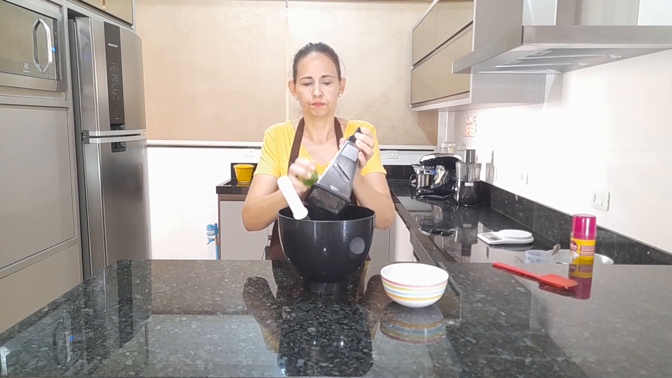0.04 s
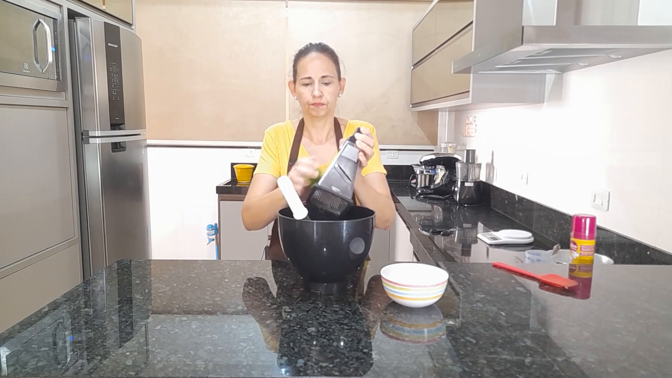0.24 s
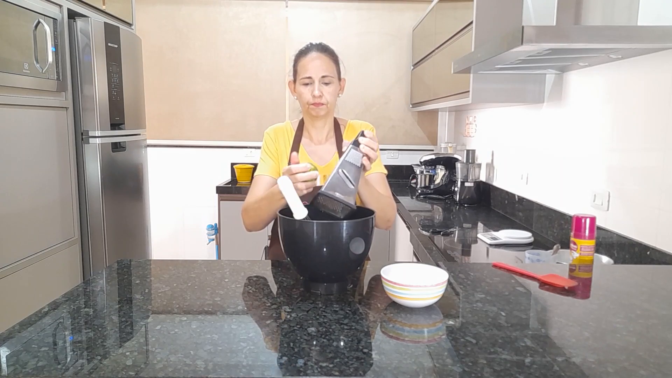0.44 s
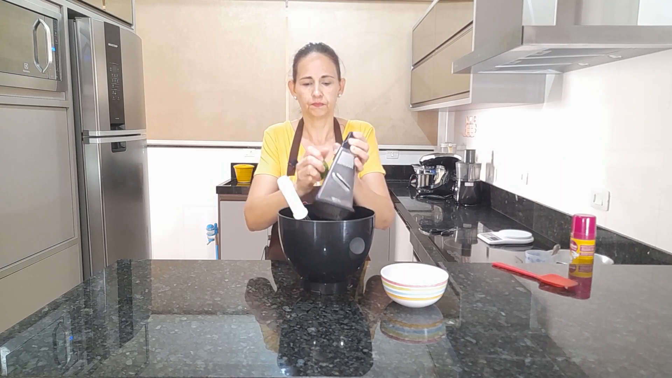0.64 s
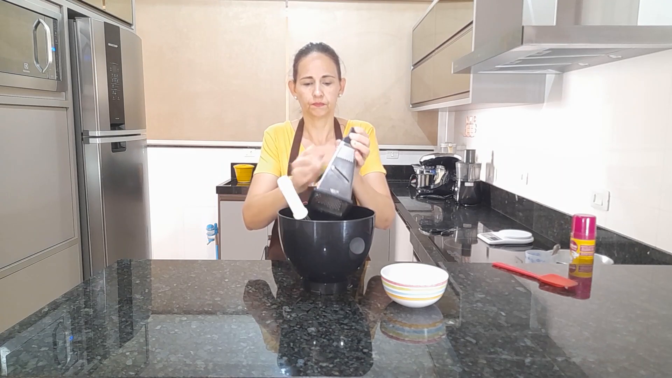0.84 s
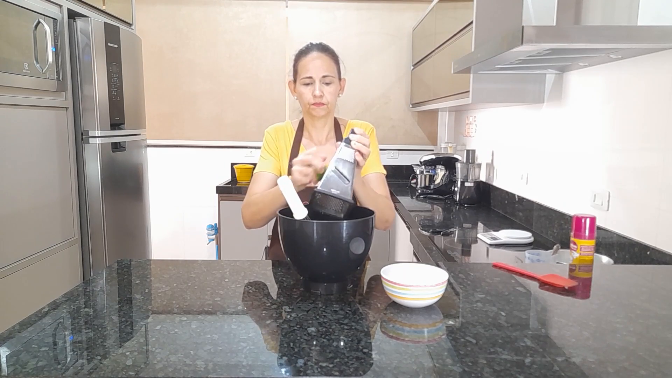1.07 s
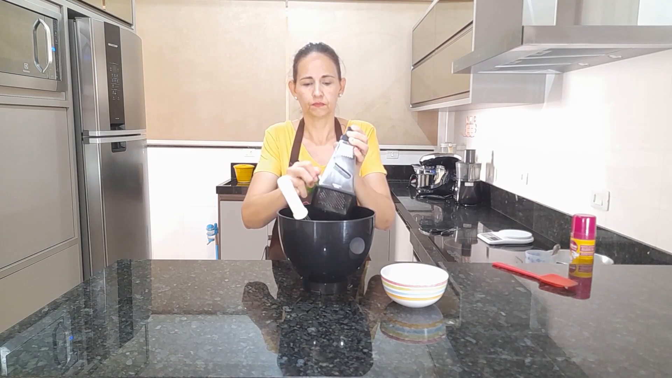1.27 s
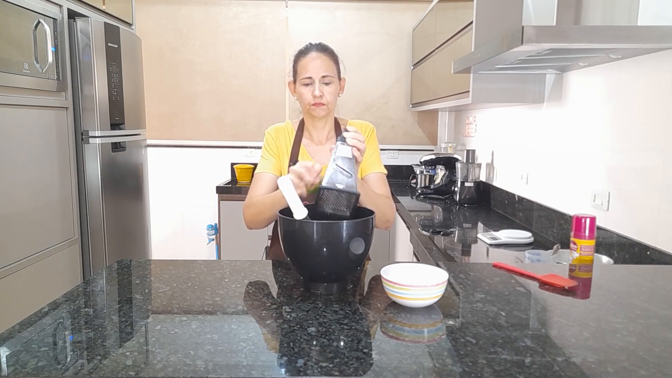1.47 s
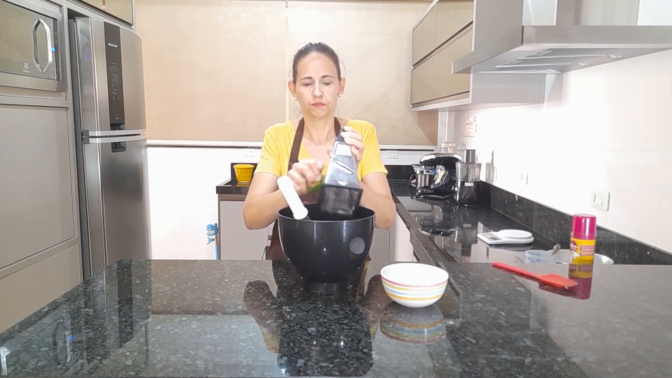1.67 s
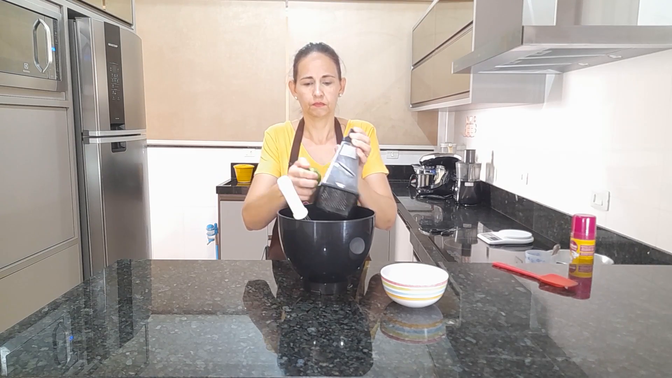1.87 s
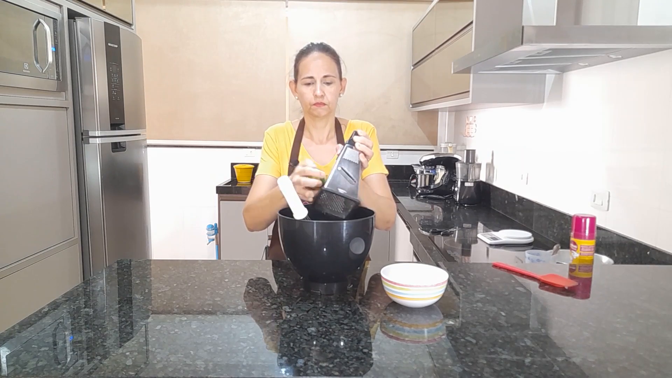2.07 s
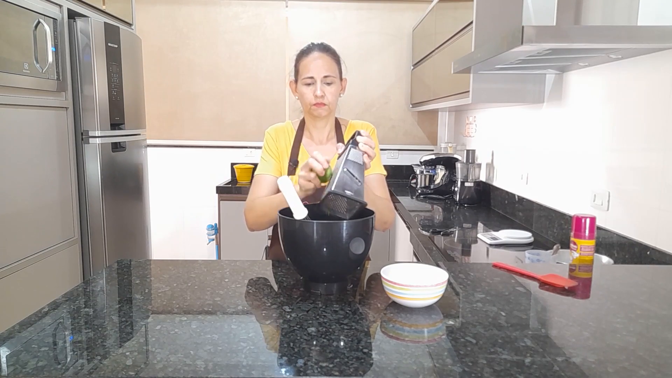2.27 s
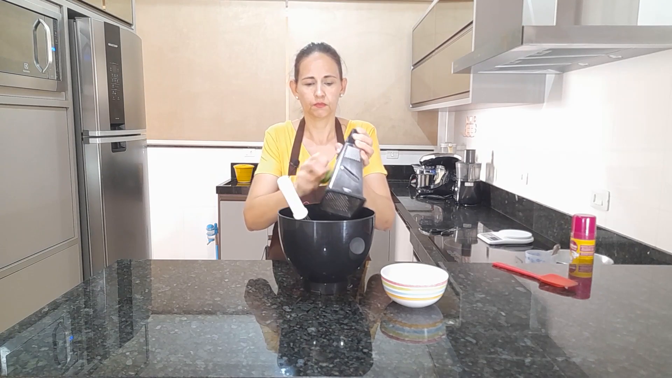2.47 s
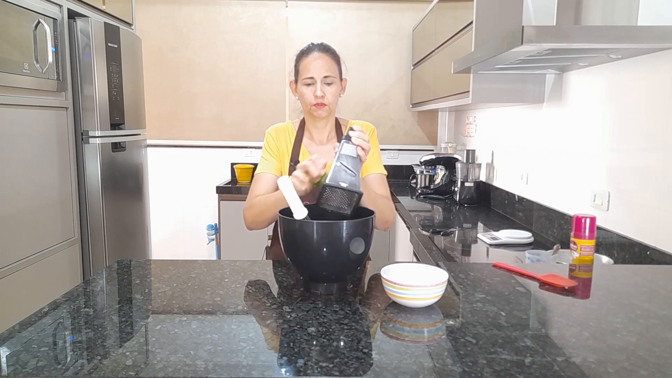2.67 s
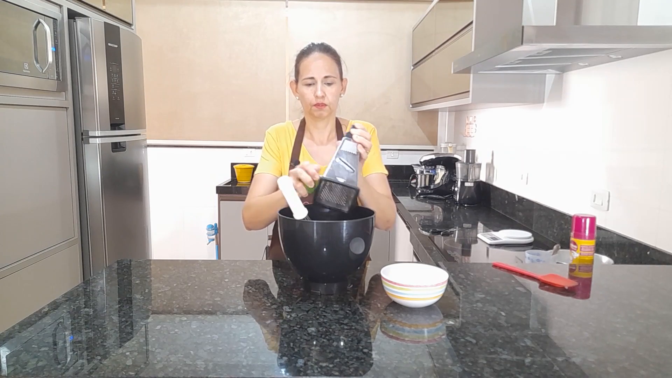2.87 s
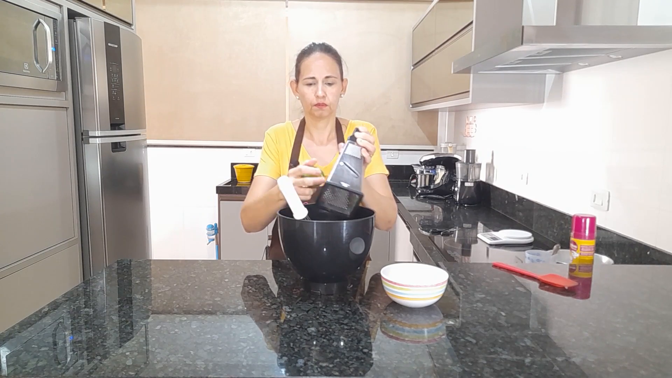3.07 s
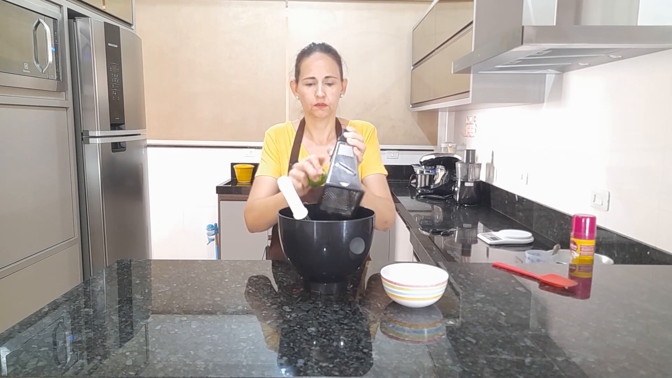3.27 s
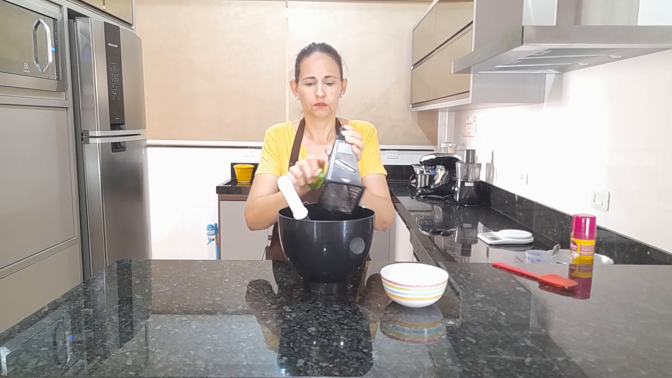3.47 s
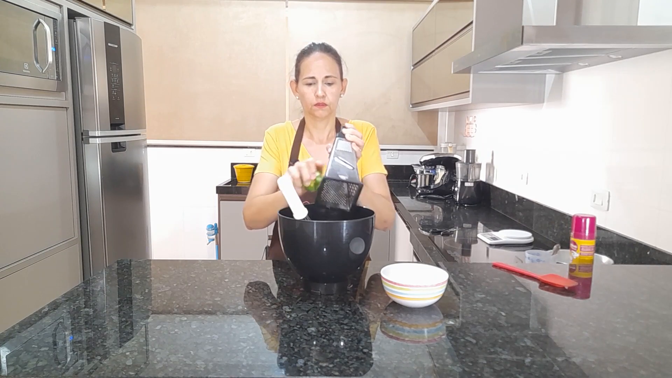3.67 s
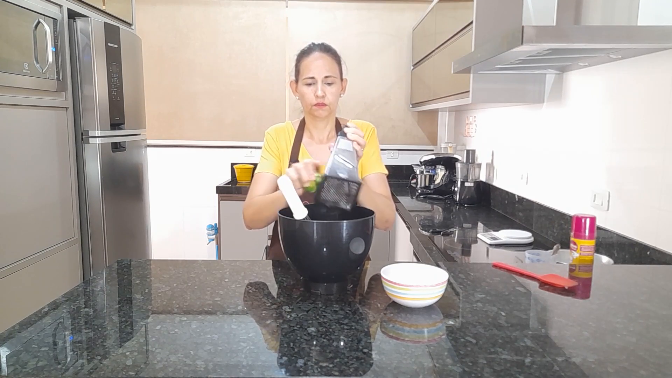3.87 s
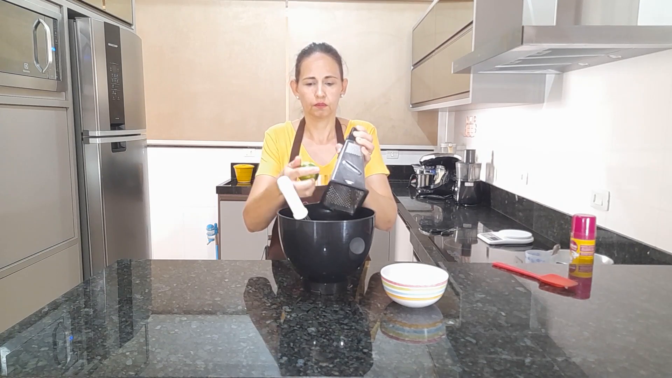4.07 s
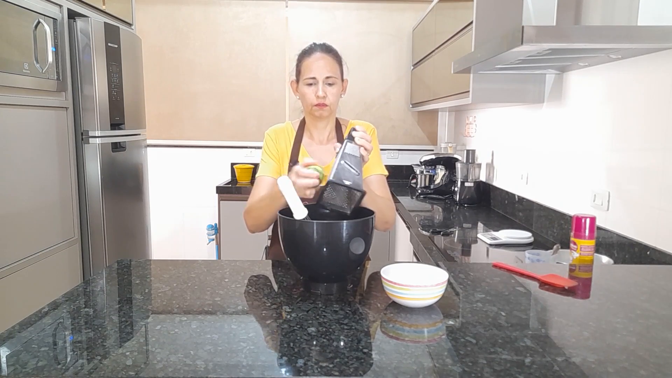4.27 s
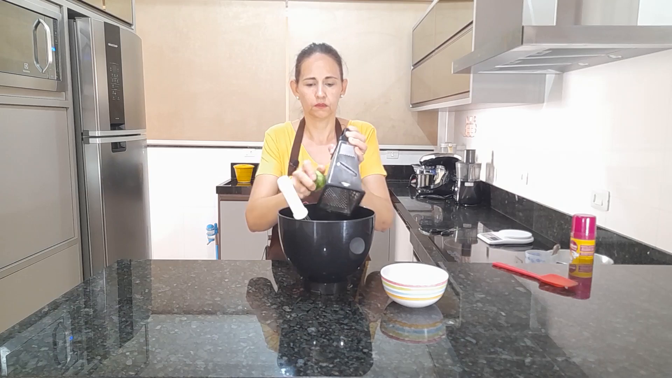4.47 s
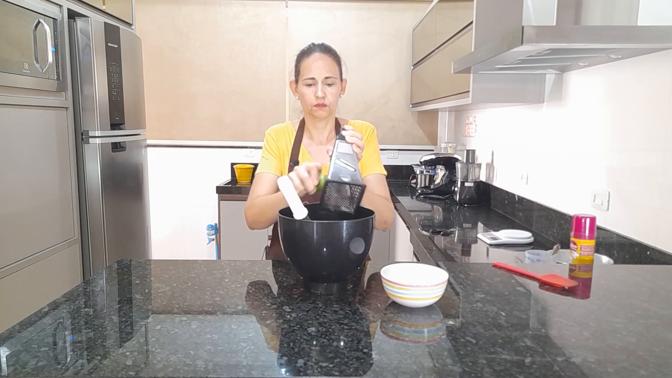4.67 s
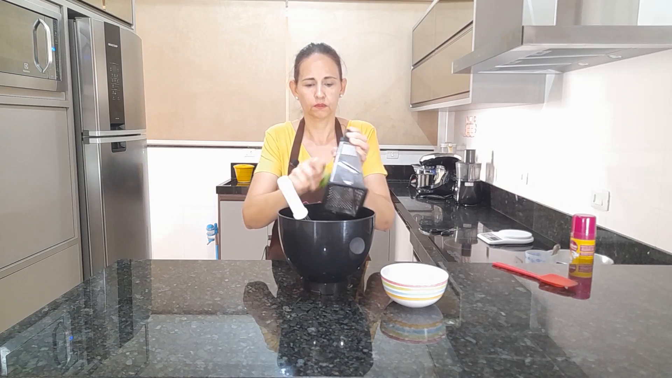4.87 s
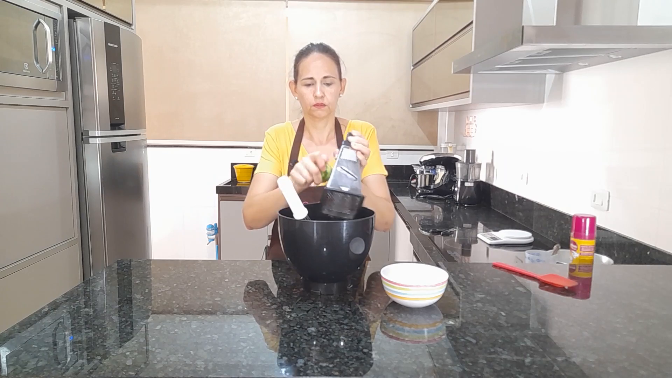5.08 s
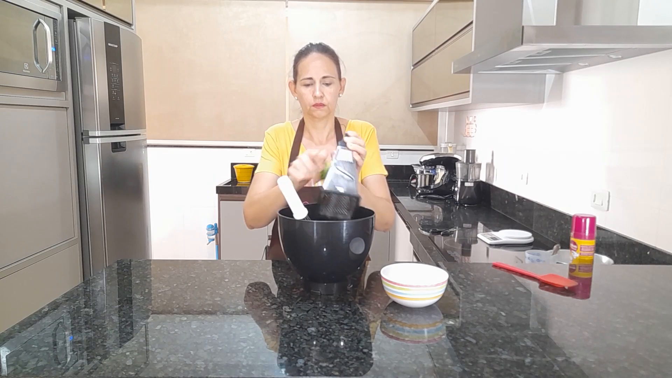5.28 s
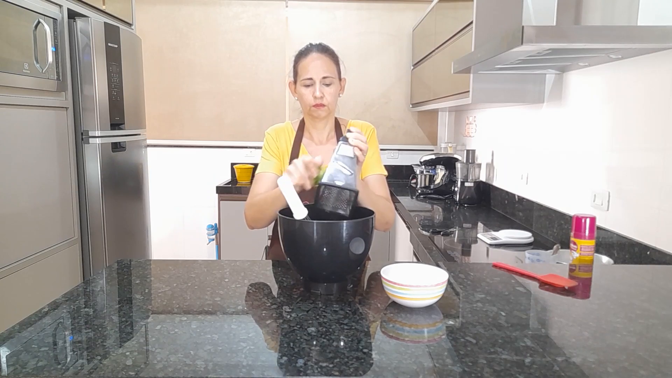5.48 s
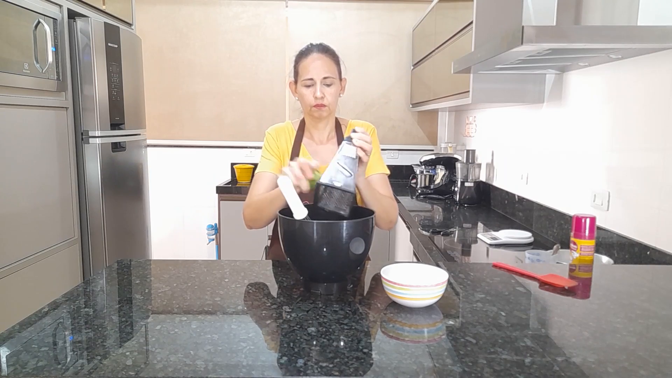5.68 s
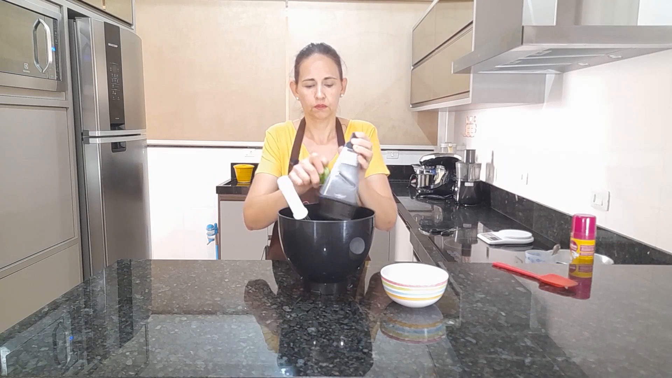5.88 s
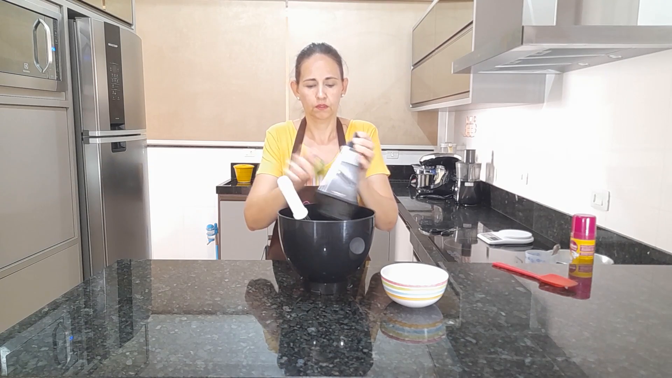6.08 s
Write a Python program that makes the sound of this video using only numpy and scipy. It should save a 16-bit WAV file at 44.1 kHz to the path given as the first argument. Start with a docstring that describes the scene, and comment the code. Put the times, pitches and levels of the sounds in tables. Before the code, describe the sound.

A lime is zested in short, scratchy strokes over a plastic bowl in a live kitchen, a faint appliance hum beneath.

```python
"""Zesting a lime over a bowl

A lime is zested on a steel box grater held over a plastic mixing bowl in a tiled kitchen.
Pushes: random snaps of peel, heard as a bright rasp and through the sheet's modes; pulls are lighter, duller.
Grater and bowl touch now and then, lastly in two hard knocks: decaying thud modes plus a noise-driven rim.
An appliance hums (sines) over room air (coloured noise); a noise tail and one echo make the room."""
import sys
import numpy as np
from scipy import signal
from scipy.fft import rfft, irfft, next_fast_len
from scipy.io import wavfile

SR = 44100
rng = np.random.default_rng(int(sys.argv[2]) if len(sys.argv) > 2 else 0)


def to_wav(sig):
    """Store sig (one row per channel, or 1-D mono) as 16-bit WAV at the path in sys.argv[1].

    Samples outside -1..1 are clipped; the rate is SR.
    """
    pcm = np.clip(np.atleast_2d(sig), -1, 1) * 32767
    pcm = np.round(pcm).astype(np.int16)
    wavfile.write(sys.argv[1], SR, pcm.T)  # frames by channels


N = 270312
TIME_S = np.arange(N) / SR

# appliance motor partials: (frequency [Hz], mean level [dB rms])
HUM_PARTIALS = [(59.2, -53), (118.4, -60), (177.6, -64), (605, -62)]
# room air spectrum: (frequency [Hz], density [dB per Hz, relative])
AIR_SPECTRUM = [(20, -14), (45, -1), (90, 0.5), (150, -1), (250, -3.5), (400, -5.5), (600, -4.5),
                (1000, -11.5), (2000, -21), (5000, -30.5), (16000, -36.5)]
AIR_RMS_DB = -51.5

# reverberant tail colour: (frequency [Hz], level [dB, relative])
ROOM_COLOUR = [(100, 6), (400, 0), (1100, 0), (2500, 3.15), (4000, -5), (5300, 1.5), (9000, -6),
               (16000, -1)]
# reverberation time: (frequency [Hz], t60 [s])
ROOM_T60 = [(150, 1), (500, 0.7), (1400, 0.69), (3700, 0.72), (6000, 0.68), (10000, 0.55), (16000, 0.34)]
ROOM_DB, CUTOFF_HZ = -11.5, 15900

# grater rim knocks on the bowl: (time [s], thud pitch [Hz], thud level [dB], rim drive [dB])
KNOCKS = [(0.6057, 442, -20.5, -32.5), (2.073, 365, -37, -34.5), (4.3221, 400, -34.5, -33.5),
          (5.763, 402, -42, -34), (5.8731, 464, -10, -15.5), (6.1154, 442, -12.5, -15)]
# grater rocked softly against the bowl: (time [s], thud pitch [Hz], thud level [dB])
BUMPS = [(.134, 407, -27.5), (.872, 443, -22.5), (2.474, 350, -27), (4.57, 410, -31.5), (5.136, 472, -28),
         (5.375, 497, -27), (5.533, 440, -22.5), (5.998, 475, -28.5)]
KNOCK_CONTACT_S, BUMP_CONTACT_S = 0.00574, 0.01345
BUMP_RIM_DB = -18  # rim drive relative to thud
# hollow thud of bowl and grater: (multiple of thud pitch [ratio], level [dB], t60 [s])
THUD_MODES = [(.19, -24.5, 0.14), (0.779, -15, 0.077), (0.999, -2.5, 0.05), (1.2, -36, 0.027)]
# clack of the grater's rim: (frequency [Hz], width [Hz], level [dB, relative])
CLACK_MODES = [(1030, 217, 2.5), (1514, 75, 7.5), (1640, 37, -8), (1760, 38, -45), (2560, 360, -9),
               (3480, 68, -2)]
# rim crack spectrum: (frequency [Hz], density [dB per Hz, relative])
CRACK_SPECTRUM = [(100, -25), (250, 2), (450, 15), (800, -19), (1300, 1), (1800, 5.5), (3500, -8),
                  (6000, -5.5), (10000, -8.5), (16000, -15.5)]

# pushes down the teeth: (start [s], length [s], tearing force [dB],
# sheet force relative to tearing [dB], side of the face [-1 to +1])
PUSHES = [ (-.05, 0.11, -26.5, -1, -0.67), (0.188, 0.085, -31, -3, -0.19), (.689, 0.1, -28, -4, -0.062),
          (0.952, 0.081, -29.5, -8, -0.096), (1.181, 0.12, -24.5, -5, -0.43), (1.433, .1, -27, -4, -0.039),
          (1.664, 0.12, -30.5, -2, 0.31), (2.315, .107, -30.5, -3.5, -0.17),
          (2.568, 0.11, -28, -6.5, -0.14), (2.789, 0.096, -25.5, -2.5, .3), (3.349, 0.096, -32.5, 0.5, 0.8),
          (3.583, 0.094, -27.5, -3.5, 0.63), (3.819, 0.1, -27, -2, .25), (4.402, 0.099, -35.5, -3.5, -0.57),
          (4.634, 0.092, -29.5, -4, 0.23), (4.866, 0.11, -28.5, -3, 0), (5.112, 0.11, -27, -3.5, 0.32),
          (5.365, 0.1, -23, -4, -0.6), (5.601, 0.086, -28.5, 2.5, 0.28)]
# light pulls back up; before the other pushes the fruit is lifted clear: (start [s], tearing force [dB])
PULLS = [(0.059, -35), (.812, -40.5), (1.047, -47), (1.304, -36.5), (2.192, -49.5), (2.432, -40),
         (2.674, -44), (3.454, -46), (3.693, -39.5), (4.496, -46.5), (4.736, -43.5), (4.984, -39.5),
         (5.229, -35.5), (5.474, -35.5)]
PULL_S, PULL_SHEET_DB = 0.1, 0.4  # sheet force relative to tearing
# fruit scuffs as it is set back on the grater:
# (start [s], tearing force [dB], sheet force relative to tearing [dB])
SCUFFS = [(0.611, -51, 8.5), (4.315, -59, 14)]
SCUFF_S = 0.05
PUSH_PEAK, PULL_PEAK, SCUFF_PEAK = 0.54, 0.72, 0.5  # share of the stroke gone at greatest force
# ring tilt: dB per octave for each dB of force above EVEN_DB
EVEN_DB, TILT_PER_DB = -32, 0.284
# peel snags on a tooth, force flares: (time [s], gain [dB])
SNAGS = [(0.233, 7), (0.73, 2.5), (1.242, 5), (1.457, 7.5)]
SNAG_SIGMA_S = 0.0023
# peel tearing spectrum: (frequency [Hz], density [dB per Hz, relative])
TEARING_SPECTRUM = [(120, -18), (260, -10), (400, 8), (700, -7.5), (1500, -1), (2800, -0.5), (4200, 1),
                    (5300, -4), (7500, 0), (10000, 0.5), (13000, -2.5), (16000, -7)]
# steel sheet: (frequency [Hz], width [Hz], level [dB, relative],
# place along the stroke of most ring [0-1], gain at side +1 [dB])
SHEET_MODES = [(343, 46, -5, 0.93, 7), (398.4, 49.6, 8, 0.88, -5.5), (666, 66, -0.5, 0.59, -0.5),
               (992, 133, 4.5, 0.53, -2), (1120, 136, 2, 1, -3), (1402, 64, 0.5, 0.36, -3.5),
               (1615, 77, 3, 0.44, 2), (2030, 45, 1.5, 1, -5), (2250, 95, 1.5, 0.88, -2),
               (2575, 34, 5.5, 0.32, -10.5), (2880, 240, -11, 0.8, -9), (3383, 250, 0.5, 0.38, 4),
               (3990, 160, -1.5, 0.63, 3.5), (4400, 460, -11, 0.6, 5), (5500, 630, -15, 1, -6),
               (6700, 320, -5.5, 0, -1), (7760, 400, -4, 0, -3), (8350, 500, -17, 0, 13)]


def from_db(db):
    """Decibels to gain."""
    return 10 ** (np.asarray(db) / 20)


def decay(t_s, t60_s):
    """Exponential fall of 60 dB in t60_s; 1 before time zero."""
    return np.exp(-np.log(1000) * np.maximum(t_s, 0) / t60_s)


def rms_one(x):
    """Scale to rms 1."""
    return x / np.sqrt(np.mean(x ** 2) + 1e-20)


def at_hz(points, hz):
    """Read a table on a log-frequency axis."""
    points = np.array(points)
    return np.interp(np.log(np.maximum(hz, 1)), np.log(points[:, 0]), points[:, 1])


def coloured(x, spectrum):
    """Shape a signal by a smooth spectrum."""
    size = next_fast_len(len(x))
    gain = from_db(at_hz(spectrum, np.fft.rfftfreq(size, 1 / SR)))
    return irfft(rfft(x, size) * gain, size)[:len(x)]


def drift(rate_per_s):
    """Random wander of spread 1: rate_per_s random points a second, joined by lines."""
    points = rng.standard_normal(8192)
    return np.interp(TIME_S * rate_per_s, np.arange(8192), points) * np.sqrt(1.5)


def resonate(x, hz, width_hz):
    """Two-pole resonance, gain 1 at its peak."""
    r = np.exp(-np.pi * width_hz / SR)
    b = np.array([1, 0, -1]) * (1 - r * r) / 2
    a = [1, -2 * r * np.cos(2 * np.pi * hz / SR), r * r]
    return signal.lfilter(b, a, x + 1e-18)


def background(waver_db, wander_rad):
    """Motor partials wavering in level and phase, over the dull rush of room air."""
    hum = 0
    for hz, db in HUM_PARTIALS:
        level = np.sqrt(2) * from_db(db + waver_db * drift(6))
        hum = hum + level * np.sin(2 * np.pi * hz * TIME_S + wander_rad * drift(1.27))
    air = rms_one(coloured(rng.standard_normal(N), AIR_SPECTRUM))
    return hum + from_db(AIR_RMS_DB) * air


def kitchen(x, gap_s, build_s):
    """Reflections off tiles and stone: a dense noise tail, each band with its own decay."""
    t_s = np.arange(SR) / SR
    white, tail = rng.standard_normal((2, SR)), 0
    edges_hz = np.geomspace(90, 18000, 33)
    for k, (low, high) in enumerate(zip(edges_hz, edges_hz[1:])):
        bandpass = signal.butter(2, [low, high], "band", fs=SR, output="sos")
        band = signal.sosfilt(bandpass, white[k % 2])  # neighbouring bands use different noise
        hz = np.sqrt(low * high)
        tail = tail + band * from_db(at_hz(ROOM_COLOUR, hz)) * decay(t_s, at_hz(ROOM_T60, hz))
    tail = tail * np.clip((t_s - gap_s) / build_s, 0, 1)
    return signal.fftconvolve(x, tail / np.sqrt(np.sum(tail ** 2)))[:N]


def worktop(x, lag_s, echo_db):
    """Add one early reflection off the stone top."""
    return x + from_db(echo_db) * np.interp(TIME_S - lag_s, TIME_S, x, left=0)


def contacts():
    """Grater-bowl touches: time [s], contact [s], thud pitch [Hz], thud [dB], rim drive [dB]."""
    sharp = [(s, KNOCK_CONTACT_S, hz, db, rim_db) for s, hz, db, rim_db in KNOCKS]
    soft = [(s, BUMP_CONTACT_S, hz, db, db + BUMP_RIM_DB) for s, hz, db in BUMPS]
    return sharp + soft


def thud(pitch_hz, t_s, swell_s):
    """The hollow body swings up while the contact lasts, then its modes die away."""
    rise = np.sin(np.pi / 2 * np.clip(t_s / swell_s, 0, 1)) ** 2
    since_s = t_s - swell_s
    modes = 0
    for ratio, db, t60_s in THUD_MODES:
        swing = np.cos(2 * np.pi * pitch_hz * ratio * since_s)
        modes = modes + from_db(db) * decay(since_s, t60_s) * swing
    return rise * modes


def knocks(clack_db, crack_db, rub_t60_s):
    """Rim chatter, noise steady during contact then dying, drives clack and crack; the body thuds."""
    out, t_s = np.zeros(N + SR), np.arange(SR // 4) / SR
    for start_s, contact_s, pitch_hz, thud_db, rim_db in contacts():
        chatter = rng.standard_normal(len(t_s))
        burst = decay(t_s - contact_s, rub_t60_s)
        clack = sum(from_db(db) * resonate(chatter * burst, hz, width_hz)
                    for hz, width_hz, db in CLACK_MODES)
        crack = burst * rms_one(coloured(chatter, CRACK_SPECTRUM))
        rim = from_db(clack_db) * clack + from_db(crack_db) * crack
        body = thud(pitch_hz, t_s, max(contact_s, .001))
        at = round(start_s * SR)
        out[at:at + len(t_s)] += from_db(thud_db) * body + from_db(rim_db) * rim
    return out[:N]


def strokes():
    """All strokes: start [s], length [s], peak share, tearing force [dB], relative sheet force [dB]."""
    pushes = [(start, length, PUSH_PEAK, db, sheet_db) for start, length, db, sheet_db, side in PUSHES]
    pulls = [(start, PULL_S, PULL_PEAK, db, PULL_SHEET_DB) for start, db in PULLS]
    scuffs = [(start, SCUFF_S, SCUFF_PEAK, db, sheet_db) for start, db, sheet_db in SCUFFS]
    return pushes + pulls + scuffs


def sideways():
    """The fruit moves across the face from the middle of one push to the next."""
    start_s, length_s, _, _, side = np.transpose(PUSHES)
    return np.interp(TIME_S, start_s + length_s / 2, side)


def snagging():
    """Force gain: 1, with a brief flare at each snag."""
    return from_db(sum(db * np.exp(-.5 * ((TIME_S - s) / SNAG_SIGMA_S) ** 2) for s, db in SNAGS))


def hand(rise_power, fall_power):
    """One arch of force per stroke: on teeth, on sheet, ring tilt [dB/octave], place along it [0-1]."""
    tear, sheet, tilt, place = np.zeros((4, N))
    for start_s, length_s, peak, db, sheet_db in strokes():
        on = (TIME_S > start_s) & (TIME_S < start_s + length_s)
        place[on] = (TIME_S[on] - start_s) / length_s
        phase = np.interp(place[on], [0, np.clip(peak, .1, .9), 1], [0, .5, 1])
        power = np.where(phase < .5, rise_power, fall_power)
        force = from_db(db) * np.abs(np.sin(np.pi * phase)) ** power
        tear[on] += force
        sheet[on] += force * from_db(sheet_db)
        tilt[on] = TILT_PER_DB * (db - EVEN_DB)
    flare = snagging()
    return tear * flare, sheet * flare, tilt, place


def teeth(per_s, size_db, judder_db, judder_per_s):
    """Tiny snaps of peel, bunched as rows of teeth catch and let go."""
    snaps = (rng.random(N) < per_s / SR) * rng.choice([-1, 1], N)
    sizes = from_db(size_db * np.minimum(rng.exponential(1, N), 4))
    return rms_one(snaps * sizes * from_db(judder_db * drift(judder_per_s)))


def grating(tear_db, sheet_db, reach, fade_db, pivot_hz):
    """Snaps make a bright rasp and ring the sheet's modes, which take turns as the fruit travels."""
    tear, sheet, tilt, place = hand(rise_power=1.03, fall_power=1.46)
    across = sideways()
    snaps = teeth(per_s=15000, size_db=2.0, judder_db=1.5, judder_per_s=300)
    rasp = rms_one(coloured(snaps, TEARING_SPECTRUM)) * tear
    rasp = rasp * from_db(tear_db + fade_db * (1.0 - place))
    ring = 0
    for hz, width_hz, db, best_place, lean_db in SHEET_MODES:
        # share follows force and side; the fruit's path wanders a little
        tilt_db = tilt * np.log2(hz / pivot_hz)
        share = from_db(db + tilt_db + lean_db * across + 2.0 * drift(25))
        near = np.exp(-.5 * ((place - best_place) / reach) ** 2)
        # each mode has its own teeth, those on its antinodes
        drive = teeth(per_s=7000, size_db=2.5, judder_db=1.13, judder_per_s=330)
        ring = ring + resonate(drive * sheet * share * near, hz, width_hz)
    return rasp + from_db(sheet_db) * ring


def scene():
    """Grater and bowl in the kitchen, over the background."""
    rasps = grating(tear_db=0.0, sheet_db=9.0, reach=0.47, fade_db=1.0, pivot_hz=1390)
    work = rasps + knocks(clack_db=7.0, crack_db=-10.0, rub_t60_s=0.052)
    room = from_db(ROOM_DB) * kitchen(work, gap_s=0.012, build_s=0.0071)
    direct = worktop(work, lag_s=.0086, echo_db=-19.0)
    return (direct + room + background(waver_db=2.5, wander_rad=0.48))[None]


def record(dry):
    """Steep low-pass at CUTOFF_HZ."""
    lowpass = signal.ellip(12, .1, 80, CUTOFF_HZ, fs=SR, output="sos")
    return signal.sosfilt(lowpass, dry)


dry = scene()
out = record(dry)
to_wav(out)
```